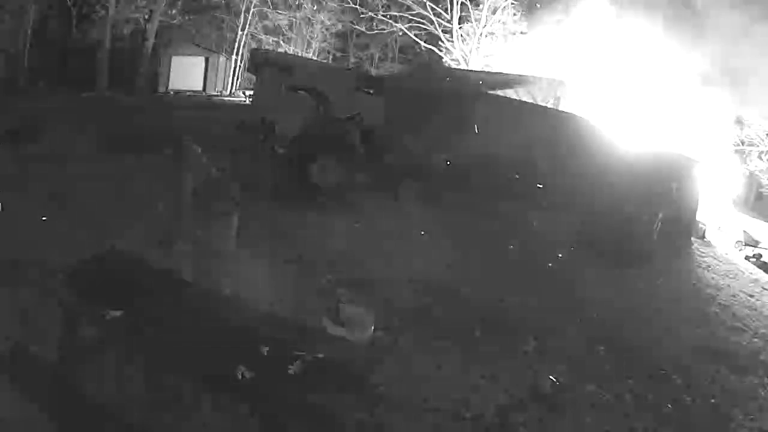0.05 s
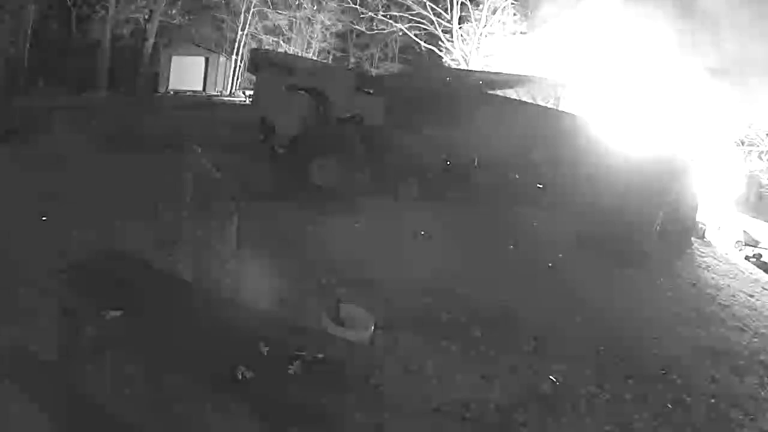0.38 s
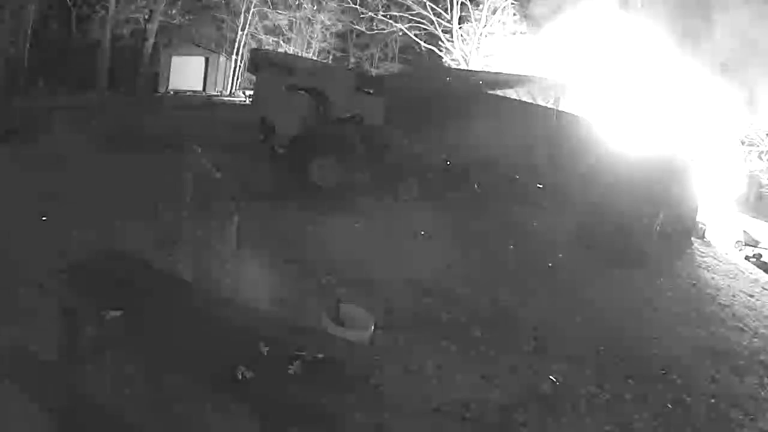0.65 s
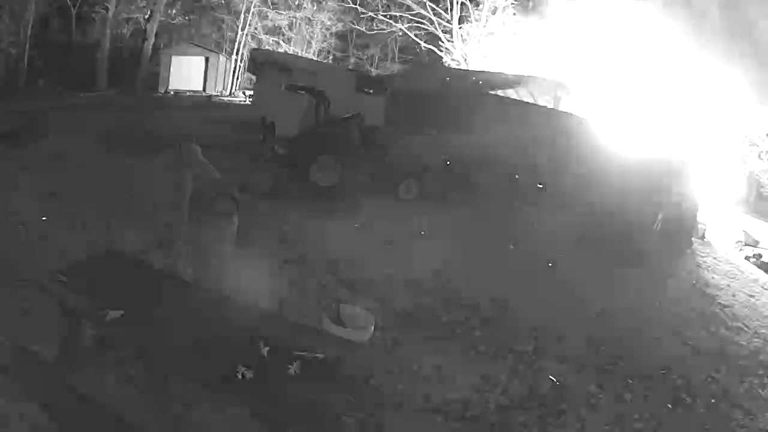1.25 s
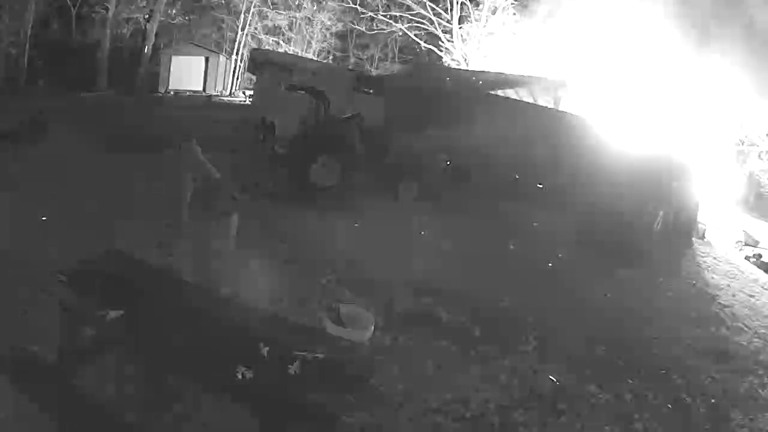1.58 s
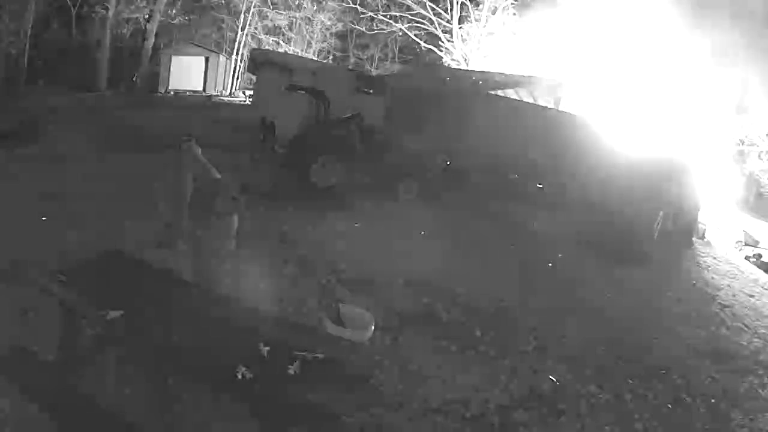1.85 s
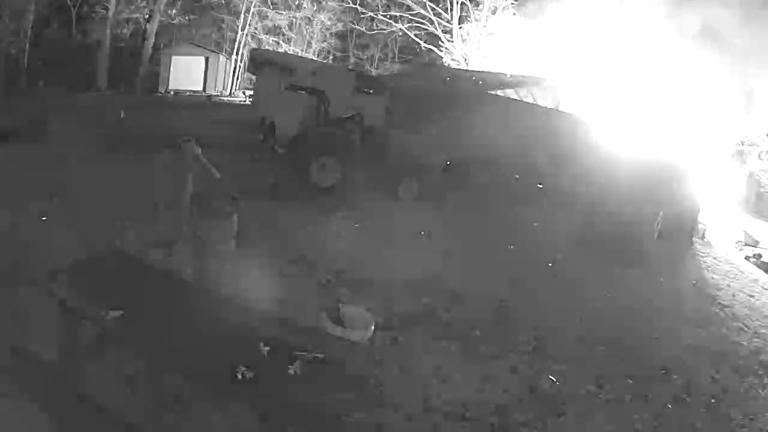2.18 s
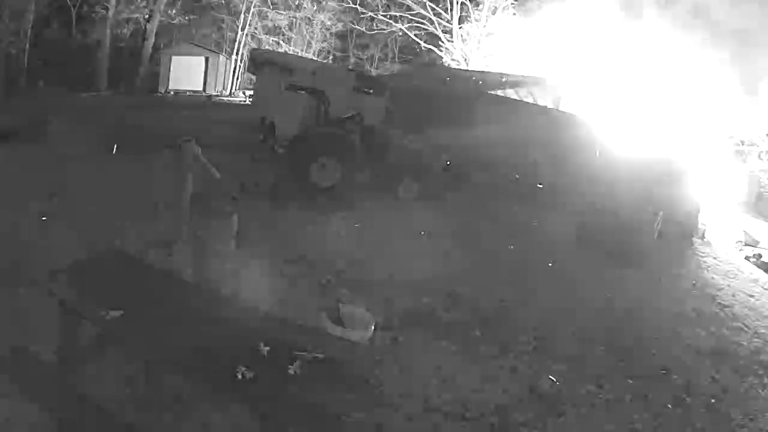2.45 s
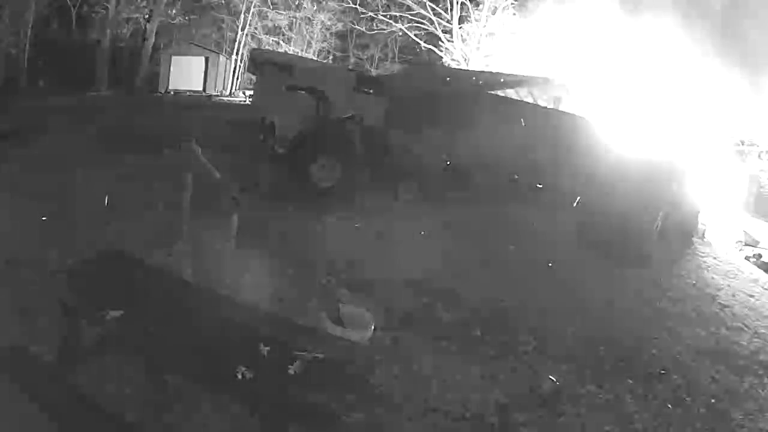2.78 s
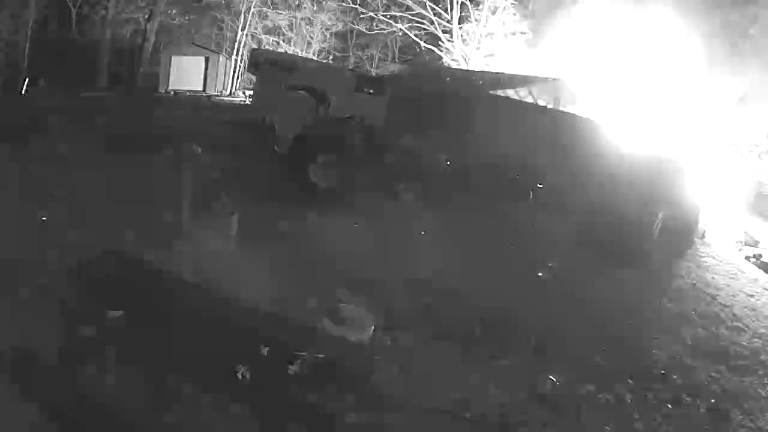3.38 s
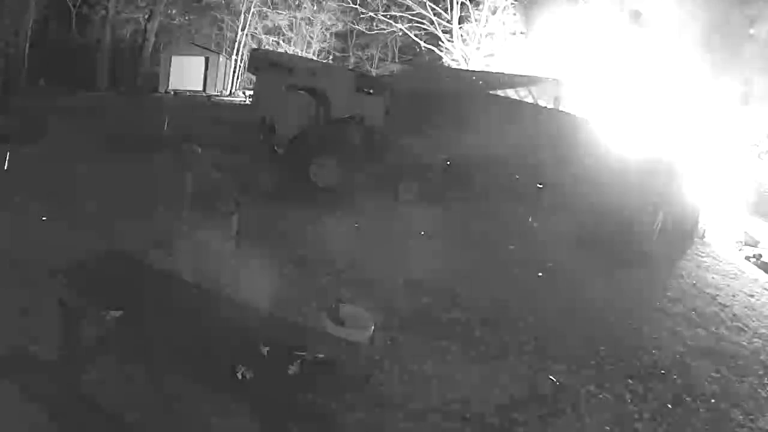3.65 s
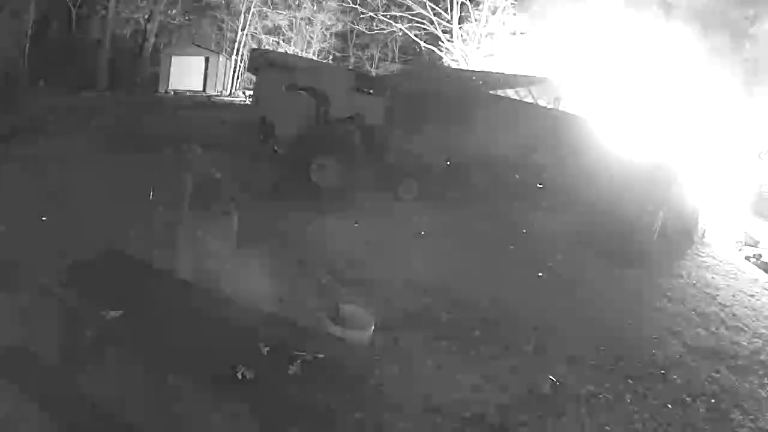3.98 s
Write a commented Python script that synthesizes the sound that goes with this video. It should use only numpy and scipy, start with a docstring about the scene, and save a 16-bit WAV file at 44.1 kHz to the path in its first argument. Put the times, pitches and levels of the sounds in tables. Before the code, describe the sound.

A burning building crackles and pops over a deep rumble, heard from across an open yard. Three sharp bangs ring off sheds and trees; afterwards the flames grow louder, with a run of dull thumps of flaring gas.

```python
"""A burning building roars low and swells toward the end, heard across a yard at night.
The flames are fluttering low-pass noise over a deep rumble and a faint sizzle. Timber snaps: each
fracture is a decaying noise burst that excites the damped modes of a board. Three loud bangs break
from the blaze as things give way in the heat; snaps and bangs reverberate off sheds and trees.
Flaring gas sends out single pressure pulses, heard as dull thumps."""
import sys
import numpy as np
from scipy import signal
from scipy.fft import rfft, irfft
from scipy.io import wavfile
from scipy.ndimage import uniform_filter1d

SR = 44100
rng = np.random.default_rng(int(sys.argv[2]) if len(sys.argv) > 2 else 0)


def digitize_waveform(pressure):
    """Quantize a signal to 16-bit integers and store it at the path in sys.argv[1].

    Rows of a 2-D input are taken as channels; values are limited to [-1, 1].
    """
    field = np.atleast_2d(pressure).T
    bounded = np.clip(field, -1, 1)
    quanta = np.round(bounded * 32767).astype(np.int16)
    wavfile.write(sys.argv[1], SR, quanta)


N = 176400
TIME, HZ = np.arange(N) / SR, np.fft.rfftfreq(8192, 1 / SR)


def amp(db):
    """Amplitude ratio of a level in decibels."""
    return 10 ** (np.asarray(db) / 20)


def unit_rms(x):
    """Normalisation to an rms of 1."""
    return x / np.sqrt(np.mean(x ** 2) + 1e-20)


def curve(points, hz=HZ):
    """Interpolation on a logarithmic frequency axis."""
    f, value = np.transpose(points)
    return np.interp(np.log(hz + 1), np.log(f + 1), value)


def add(mix, start_s, sound):
    """Superposition of a delayed sound on the mix."""
    part = mix[max(round(start_s * SR), 0):][:len(sound)]
    part += sound[:len(part)]


def decay(t, t60):
    """Exponential damping: 60 dB in t60, from t = 0."""
    return np.exp(-np.log(1000) * np.maximum(t, 0) / t60)


def colour(x, db):
    """Minimum-phase filtering to a given spectrum, conserving the power of white noise."""
    log_gain = np.log(amp(np.maximum(db, db.max() - 90)))
    mirrored = np.concatenate([log_gain, log_gain[-2:0:-1]])
    response = np.exp(np.conj(signal.hilbert(mirrored)))
    taps = np.fft.ifft(response).real[:len(HZ)]
    return signal.oaconvolve(x, taps / np.linalg.norm(taps))[:len(x)]


def wander(hz):
    """Slow random modulation: noise through a Gaussian low-pass of width hz."""
    low_pass = np.exp(-(np.fft.rfftfreq(N, 1 / SR) / hz) ** 2)
    return unit_rms(irfft(rfft(rng.standard_normal(N)) * low_pass, N))


def noise(spectrum):
    """Stationary Gaussian noise with a given spectrum."""
    gain = amp(curve(spectrum, np.fft.rfftfreq(N, 1 / SR)))
    return unit_rms(irfft(rfft(rng.standard_normal(N)) * gain, N))


def impulses(per_s, spread_db, cap_db):
    """A Poisson process: independent impulses with exponentially distributed levels."""
    sizes = amp(np.minimum(rng.exponential(spread_db, N), cap_db))
    return sizes * (rng.random(N) < per_s / SR)


# Envelope of the roar [t/s, level/dB]
ROAR_ENVELOPE = [(0, -52), (.6, -55.5), (1.0, -52), (1.3, -55.5), (1.8, -49), (2.3, -51.5), (2.5, -49.5),
                 (2.9, -52.5), (3.05, -39), (3.5, -40), (3.85, -38.5), (4, -38)]
# Spectrum of burning gas, shared with the thumps [f/Hz, level/dB]
ROAR_SPECTRUM = [(40, -14.5), (90, -10), (160, 0.5), (280, -3), (400, -5.5), (500, -16), (620, -23),
                 (800, -30.5), (1500, -45.5)]
# Brief flare-ups of the flames [peak t/s, Gaussian width/s, level/dB]
FLAME_SURGES = [(.33, 0.033, -47), (.43, .025, -42.5), (0.929, 0.027, -34), (1.128, 0.023, -40.5),
                (1.429, 0.017, -36.5), (1.506, 0.018, -41.5), (1.909, .025, -45.5), (2.171, 0.029, -40),
                (2.27, 0.033, -43.5), (2.60, 0.026, -40.5), (2.691, 0.034, -47.5), (2.776, 0.036, -38.5),
                (3.21, 0.021, -37)]
# Spectrum of the flare-ups [f/Hz, level/dB]
SURGE_SPECTRUM = [(40, -11), (100, -0.5), (170, -1.5), (300, -1), (420, -4.5), (540, -10), (640, -23),
                  (850, -38), (1500, -58)]

def flames(puff_db=-7.5, flutter_db=3, flutter_hz=25.2):
    """Combustion noise: a low roar with small puffs and short surges, amplitude-modulated at random."""
    puffs = impulses(per_s=71, spread_db=3, cap_db=9) * rng.choice([-1, 1], N)
    puffs = unit_rms(colour(puffs, curve(ROAR_SPECTRUM)))
    swell = amp(np.interp(TIME, *np.transpose(ROAR_ENVELOPE)))
    roar = swell * (noise(ROAR_SPECTRUM) + amp(puff_db) * puffs)
    surges = sum(amp(db) * np.exp(-.5 * ((TIME - peak_s) / width_s) ** 2)
                 for peak_s, width_s, db in FLAME_SURGES)
    roar += surges * noise(SURGE_SPECTRUM)
    return roar * amp(flutter_db * wander(flutter_hz))


# Spectrum of the fire's rumble [f/Hz, level/dB]
RUMBLE_SPECTRUM = [(10, -23.5), (25, -6), (40, -0.5), (56, 3), (80, -4.5), (130, -9.5), (300, -27.5),
                   (800, -64)]

def rumble(level_db=-45.5):
    """Stationary low-frequency noise beneath the flames."""
    return amp(level_db) * noise(RUMBLE_SPECTRUM)


# Spectrum of cracking wood, shared with the snaps [f/Hz, level/dB]
CRACK_SPECTRUM = [(200, -19.5), (700, -4), (1400, -2.5), (2500, -2), (4000, -4), (5200, -4.5), (7300, -6),
                  (9000, -9)]
# Envelope of the hiss [t/s, level/dB]
HISS_ENVELOPE = [(0, -53.5), (.3, -53.5), (.55, -55.5), (1.3, -51), (2.5, -51), (3.1, -49), (3.6, -51),
                 (4, -54)]
# Spectrum of the hiss [f/Hz, level/dB]
HISS_SPECTRUM = [(100, 16), (600, -1), (1000, -1.5), (1800, 0.5), (3000, -4), (5000, -7), (7400, -5),
                 (9000, -13.5)]

def sizzle(crackle_db=-62, t60=0.18):
    """Incoherent summation: many small, distant crackles add in power, over a soft hiss."""
    sizes = impulses(per_s=60, spread_db=4, cap_db=16)
    power = signal.oaconvolve(sizes ** 2, decay(TIME[:SR // 2], t60) ** 2)[:N]
    crackle = np.sqrt(abs(power)) * rng.standard_normal(N)
    crackle = unit_rms(colour(crackle, curve(CRACK_SPECTRUM)))
    hiss = amp(np.interp(TIME, *np.transpose(HISS_ENVELOPE))) * noise(HISS_SPECTRUM)
    return amp(crackle_db) * crackle + hiss


# Reverberation time of the yard [f/Hz, T60/s]
YARD_DECAY = [(100, 3.3), (400, 0.48), (900, 1.53), (2000, 0.87), (4000, 0.97), (7500, 0.98)]

def yard_echo(trees_s=0.11, trees_width_s=0.044, trees_db=5.5, far_db=-4, far_stretch=1.81):
    """Reverberation: frequency-dependent decay, a swell reflected by the trees and a longer far tail."""
    size, rise_s = 2 * SR, 0.017
    hz, t, bands = signal.stft(rng.standard_normal(size), SR, nperseg=256)
    t60 = curve(YARD_DECAY, hz)[:, None]
    fade = np.hypot(decay(t, t60), amp(far_db) * decay(t, far_stretch * t60))
    trees = amp(trees_db * np.exp(-.5 * ((t - trees_s) / trees_width_s) ** 2))
    tail = signal.istft(bands * fade * trees, SR, nperseg=256)[1][:size]
    return tail * np.minimum(TIME[:size] / rise_s, 1)


def fracture(rise_s, t60, grain_db, echo_db, hold_s=0):
    """A dense run of tiny breaks, comb-filtered by reflections off walls and ground, then reverberated."""
    bounces, bounce_gain, shortest_s, longest_s = 3, 0.25, 0.0008, 0.009
    t = TIME[:SR]
    clumps = unit_rms(uniform_filter1d(rng.standard_normal(SR), size=40))
    splinters = unit_rms(rng.standard_normal(SR) * amp(grain_db * clumps))
    crack = splinters * np.minimum(t / rise_s, 1) * decay(t - rise_s - hold_s, t60)
    crack /= np.sqrt(1 + bounces * bounce_gain ** 2)  # direct sound and bounces share the power
    out = amp(echo_db) * yard_echo()
    add(out, 0, crack)
    for place in rng.random(bounces):
        add(out, shortest_s * (longest_s / shortest_s) ** place, bounce_gain * crack)
    return out


def timber_response(centre_hz, boost_db, tilt_db, width_octaves=0.26):
    """Frequency response of timber in dB: one broad resonance and a slope per octave above 700 Hz."""
    tilt = tilt_db * np.log2(np.maximum(HZ, 700) / 2000)
    octaves = np.log2((HZ + 1) / centre_hz)
    return tilt + boost_db * np.exp(-.5 * (octaves / width_octaves) ** 2)


# Normal modes of a board [ratio to the ring frequency, level/dB]
WOOD_MODES = [(1.001, 1.5), (1.278, -8.5), (1.56, -19.5), (2.019, -4.5), (3.03, -4.5)]

def board_ring(ring_hz, rise_s, t60):
    """Free vibration of a split board: a sum of damped modes with random phases."""
    t = TIME[:SR // 2]
    modes = sum(amp(db) * np.sin(2 * np.pi * (ratio * ring_hz * t + rng.random()))
                for ratio, db in WOOD_MODES)
    return modes * np.minimum(t / rise_s, 1) * decay(t - rise_s, t60)


# Snapping timber [t/s, level/dB, rise/s, T60/s, ring f/Hz, resonance index, tilt/(dB per octave)]
TIMBER_SNAPS = [(.003, -51, 0.0033, 0.74, 1700, 7, -2), (0.1, -45.5, 0.0018, 0.16, 3200, 9, -1.5),
                (0.118, -46, 0.0024, 0.3, 3700, 9.5, 1), (.193, -43.5, 0.013, 0.13, 5000, 6, 1),
                (0.388, -52, .002, 0.03, 2500, -4, -1.5), (0.424, -54, .002, .07, 1500, 3, -8),
                (.629, -35, 0.0037, 0.14, 1750, 6.5, -0.7), (.675, -44, 0.0024, 0.68, 6500, 0, 2),
                (.969, -35, 0.002, 0.22, 5000, 6, 3.5), (1.005, -26.5, 0.0021, 0.057, 5500, 4.5, 6),
                (1.223, -37, 0.002, 0.25, 1170, 11.5, -2), (1.289, -44, .004, 0.14, 6500, 6, 2),
                (1.410, -46.5, .003, 0.045, 2200, -6, -12), (1.453, -45, .006, 0.17, 7000, 0.5, 7),
                (1.467, -39, 0.0024, 0.33, 5500, 5, 5.5), (1.520, -35, 0.007, 0.19, 2400, 4, -2.5),
                (1.690, -34, 0.0037, 0.26, 4000, 2, 0), (1.833, -39.5, .002, 0.055, 2000, 10.5, -5),
                (2.231, -37, 0.0042, 0.086, 6200, 6.5, 1.5), (2.248, -34, 0.0026, .05, 6200, 1, 12.5),
                (2.420, -42.5, .003, 0.12, 1900, -3, -1), (2.530, -50, .002, 0.029, 2000, 16, -5.5),
                (2.639, -50.5, 0.0043, 0.25, 2000, 4.5, -6.5), (2.778, -39, 0.00087, 0.21, 2500, 5.5, 0.5),
                (2.862, -40, .003, 0.063, 6500, 0, 4), (2.897, -45, .002, 0.14, 3000, -0.5, -1.5),
                (3.015, -45, 0.0022, 0.097, 5000, 9.5, 2.5), (3.038, -44.5, .003, 0.054, 4000, -5, -1),
                (3.115, -38, 0.0085, 0.07, 1837, 9.5, -0.8), (3.297, -48, 0.0013, 0.2, 2500, -3.5, -4),
                (3.419, -30, 0.0091, 0.22, 2540, 11, -0.9), (3.66, -46, 0.0023, .08, 2100, 9, -2.5),
                (3.941, -41, 0.0057, 0.043, 1950, 9.5, -1)]

def snaps():
    """Impulsive excitation: a burning board splits and rings, the louder the more resonant it is."""
    out = np.zeros(N)
    for start_s, db, rise_s, t60, ring_hz, resonance, tilt_db in TIMBER_SNAPS:
        spectrum = curve(CRACK_SPECTRUM) + timber_response(ring_hz, resonance / 2, tilt_db)
        crack = fracture(rise_s, t60, grain_db=3, echo_db=-23.5)
        add(out, start_s, amp(db) * colour(crack, spectrum))
        ring_db = db - 21 + 1.5 * resonance
        add(out, start_s, amp(ring_db) * board_ring(ring_hz, rise_s, 0.55 * t60))
    return out


# Loud reports [t/s, level/dB, rise/s, early T60/s, echo/dB, body f/Hz, body boost/dB,
# tilt/(dB per octave), bass shelf/dB]
LOUD_BANGS = [(0.8213, -20, 0.0027, 0.19, -15.5, 1600, 6.5, 1.33, 18.5),
              (1.5306, -14.5, 0.0034, 0.14, -17, 1526, 1.5, 0, 2.5),
              (1.957, -16, 0.0013, .18, -18.5, 1900, -1.5, 0.93, -4)]
# Spectrum common to the reports [f/Hz, level/dB]
BANG_SPECTRUM = [(60, -15.5), (200, -0.5), (400, 3), (700, -2.5), (1000, -3.5), (1300, -1), (2100, 4),
                 (2550, 0.5), (3000, 0), (3800, -1), (4700, -5.5), (6000, -10), (7200, -10), (9000, -18.5)]

def bangs():
    """Broadband transients: something gives way in the heat and radiates a sharp report."""
    out = np.zeros(N)
    for start_s, db, rise_s, t60, echo_db, body_hz, boost_db, tilt_db, bass_db in LOUD_BANGS:
        bass_shelf = bass_db / (1 + (HZ / 800) ** 2)
        spectrum = curve(BANG_SPECTRUM) + timber_response(body_hz, boost_db, tilt_db) + bass_shelf
        report = fracture(rise_s, t60, grain_db=0.5, echo_db=echo_db, hold_s=0.002)
        add(out, start_s, amp(db) * colour(report, spectrum))
    return out


# Flaring gas [t/s, peak level/dB, f/Hz]
GAS_THUMPS = [(0.8236, -12, 172), (0.9571, -25, 181), (1.201, -26, 146), (2.564, -33.5, 168),
              (2.9443, -14.5, 164), (3.1848, -19.5, 162), (3.4243, -19.5, 208), (3.4533, -14.5, 135),
              (3.4912, -16, 170), (3.5526, -21.5, 187)]

def thumps(skew=0.13, echo_db=-20.5, echo_t60=1.44, scatter_db=-21.5, scatter_t60=0.037):
    """Each gas flare radiates one pulse (compression, rarefaction, compression) and leaves a low echo."""
    out = np.zeros(N)
    fade = amp(echo_db) * decay(TIME, echo_t60) + amp(scatter_db) * decay(TIME, scatter_t60)
    for peak_s, db, hz in GAS_THUMPS:
        u = np.pi * hz * (TIME - peak_s)
        pulse = (2 * u ** 2 - 1) * np.exp(-u ** 2) * (1 + skew * u)
        out += amp(db) * pulse
        echo = colour(rng.standard_normal(N) * fade, curve(ROAR_SPECTRUM))
        add(out, peak_s, amp(db) * echo)
    return out


def scene():
    """Linear superposition of all the fire's sources, in mono."""
    return (bangs() + snaps() + thumps() + flames() + rumble() + sizzle())[None]


# Frequency response of the microphone [f/Hz, level/dB]
MIC_RESPONSE = [(20, 0), (7400, -0.5), (7900, -4), (8400, -10.5), (8800, -20.5), (9100, -42.5)]

def record(dry):
    """Low-pass filtering: the microphone's treble roll-off, then a band limit at 9100 Hz."""
    gain = amp(curve(MIC_RESPONSE, np.fft.rfftfreq(2 * N, 1 / SR)))
    dull = irfft(rfft(dry, 2 * N) * gain, 2 * N)[:, :N]
    band_limit = signal.firwin(511, 9100, window=("kaiser", 9), fs=SR)
    return signal.oaconvolve(dull, band_limit[None], "same")


dry = scene()
out = record(dry)
digitize_waveform(out)
```